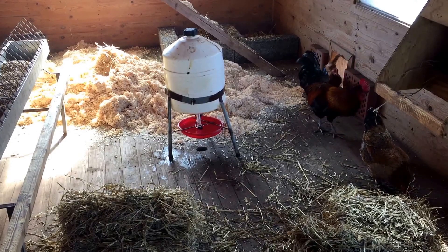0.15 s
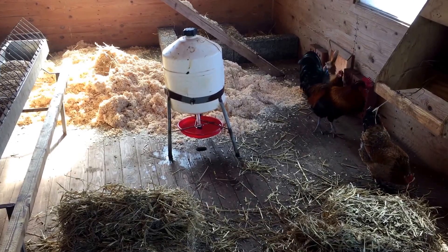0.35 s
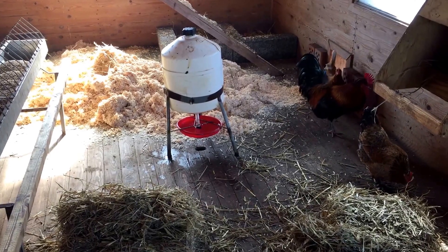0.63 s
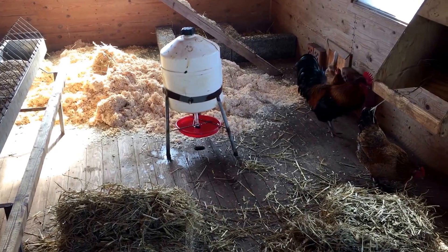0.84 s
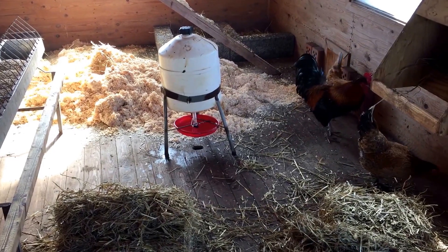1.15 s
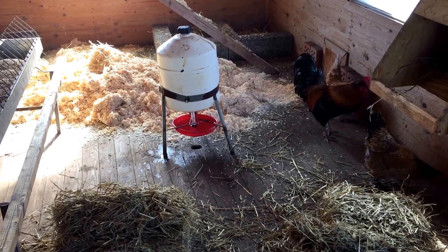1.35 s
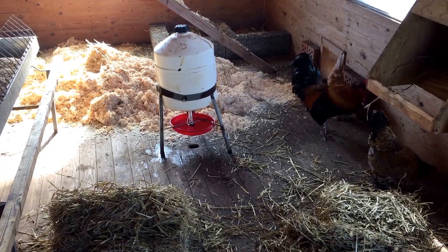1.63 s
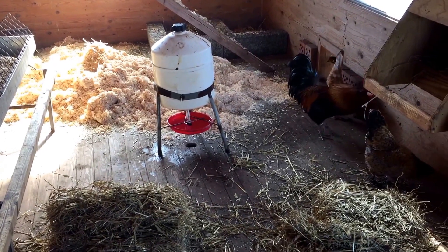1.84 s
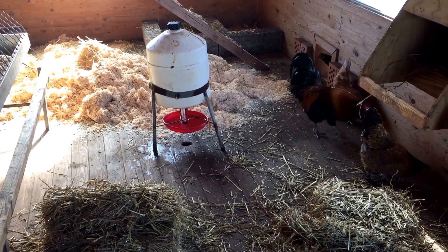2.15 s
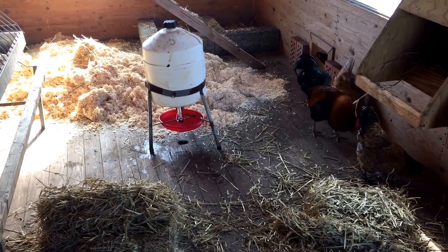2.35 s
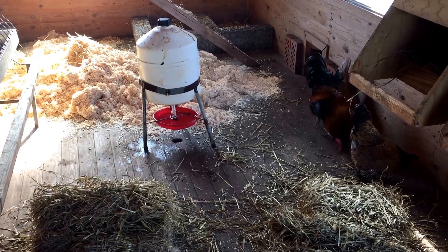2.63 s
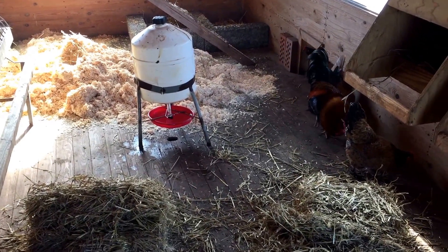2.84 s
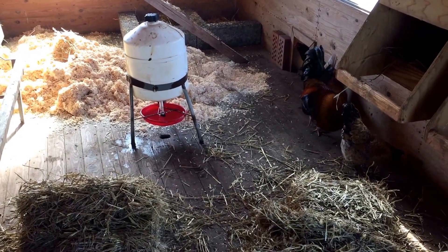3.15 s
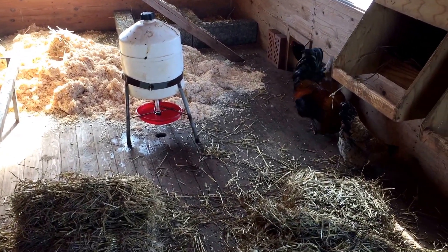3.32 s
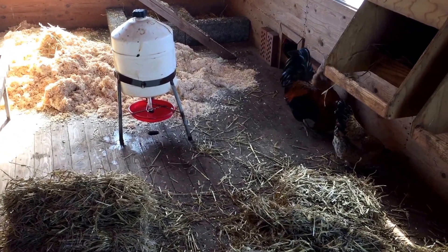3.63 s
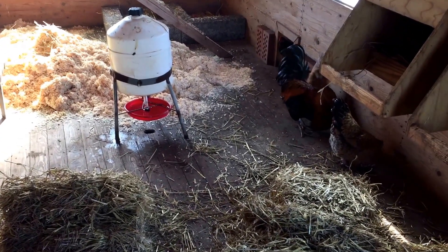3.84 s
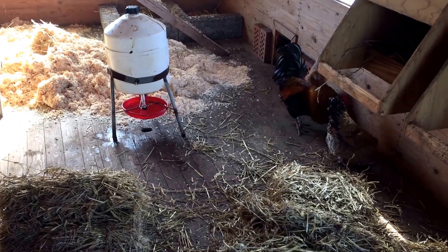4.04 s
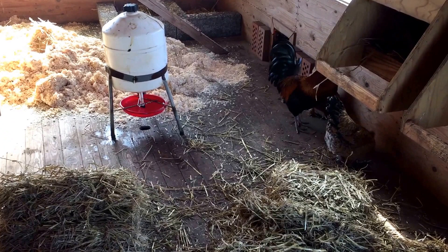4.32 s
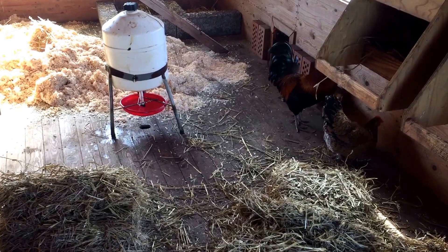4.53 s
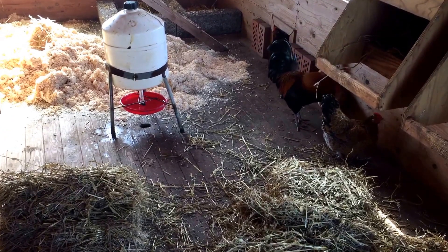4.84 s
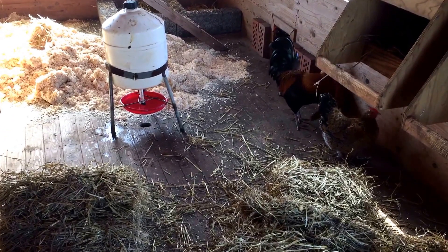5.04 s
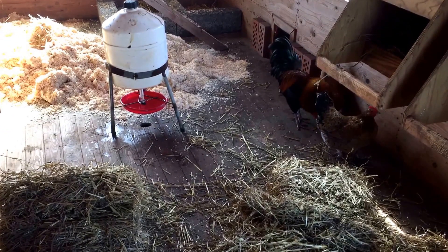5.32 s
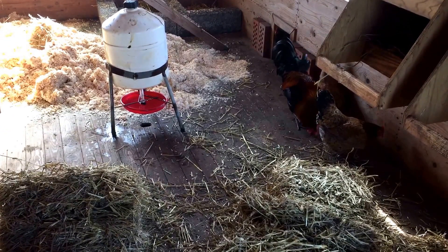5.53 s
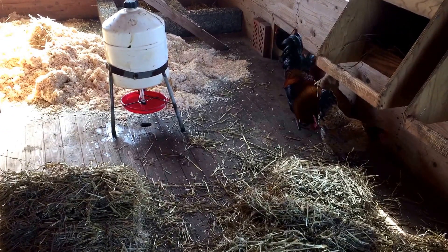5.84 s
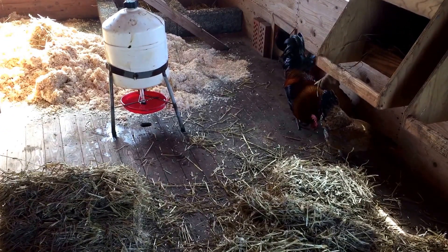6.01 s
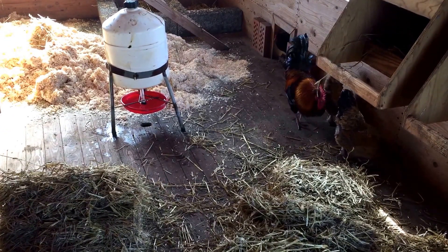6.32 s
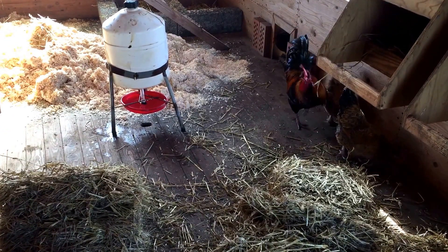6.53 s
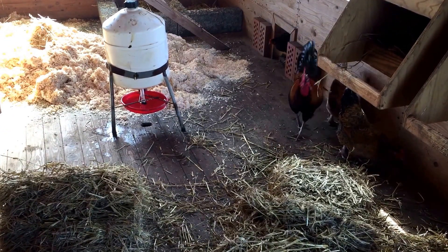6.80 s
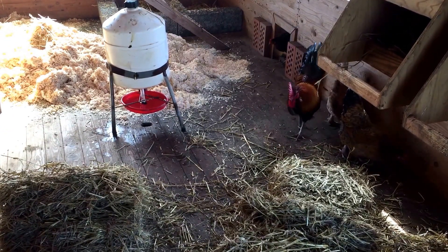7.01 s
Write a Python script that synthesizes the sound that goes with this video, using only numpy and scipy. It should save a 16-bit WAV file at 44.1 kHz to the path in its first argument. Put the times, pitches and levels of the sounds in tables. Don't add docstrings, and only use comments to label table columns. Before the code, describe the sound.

Hens cluck loudly in a bare plank coop, then calls thin out, leaving foot thuds, beak ticks and light straw crackle over soft hiss.

```python
import sys
import numpy as np
from scipy import signal
from scipy.fft import rfft, irfft
from scipy.io import wavfile
from scipy.ndimage import uniform_filter1d

SR = 44100
rng = np.random.default_rng(int(sys.argv[2]) if len(sys.argv) > 2 else 0)


def volts_from_db(level):
    exponent = np.asarray(level, float) / 20
    return 10 ** exponent


def wav_record(signal):
    frames = np.transpose(np.atleast_2d(signal))
    bounded = np.clip(frames, -1, 1)
    quanta = np.round(bounded * 32767).astype(np.int16)
    wavfile.write(sys.argv[1], SR, quanta)


N = 316094
CLEAR_BREATH, ROUGH_BREATH = 0.55, 0.9


def band(x, hz, width_hz):
    return signal.lfilter(*signal.iirpeak(hz, hz / width_hz, fs=SR), x)


def low(x, hz):
    return signal.sosfilt(signal.butter(4, min(hz, 0.45 * SR), fs=SR, output="sos"), x)


def unit(x):
    return x / np.max(np.abs(x))


def decay(t, t60_s):
    return np.exp(-np.log(1000) * t / t60_s)


def colour(x, table):
    hz, db = np.transpose(table)
    f = np.maximum(np.arange(len(x) // 2 + 1) * SR / len(x), 1)
    y = irfft(rfft(x) * volts_from_db(np.interp(np.log(f), np.log(hz), db)), len(x))
    return y / np.sqrt(np.mean(y ** 2))


def add(track, start_s, x):
    i = int(start_s * SR)
    track[i:i + len(x)] += x[:N - i]


def swells(table, rise_db_s, fall_db_s):
    t = np.arange(N) / SR
    gain = np.zeros(N)
    for s, db, hold_s in table:
        before_s = np.maximum(s - t, 0)
        after_s = np.maximum(t - s - hold_s, 0)
        gain += volts_from_db(db - rise_db_s * before_s - fall_db_s * after_s)
    return gain


def cluck(hz, throat_hz, swell_s, beak_db, beak, hold_s, jitter, breath, sag, wide, chest):
    t = np.arange(int(0.15 * SR)) / SR
    wobble, air_noise = rng.standard_normal((2, len(t)))
    wobble = uniform_filter1d(wobble, size=128) * np.sqrt(128)
    swell_s = max(swell_s, 0.001)
    end_s = swell_s + hold_s
    phase = np.cumsum(hz * (1 + sag * (0.5 - t / end_s) + jitter * wobble)) / SR
    puff = np.exp(-(phase % 1) / 0.053)
    shape = np.clip(t / swell_s, 0, 1) ** 2 * np.clip((end_s - t) / (1.32 * hold_s), 0, 1)
    leak = 0.16
    source = (puff - 0.07 + breath * air_noise * (puff + leak)) * shape

    pipe = chest * band(source, throat_hz, 2.2 * throat_hz)
    pipe += 1.45 * band(source, throat_hz, wide * throat_hz)
    top_hz = 1.218 * throat_hz + 300
    pipe = low(low(band(pipe, throat_hz, 2 * throat_hz), top_hz), top_hz)

    treble = np.zeros(len(t))
    for f, width_hz, db in beak:
        ring = band(band(band(source, f, width_hz), f, 3 * width_hz), f, 3 * width_hz)
        treble += volts_from_db(db) * unit(ring)
    return unit(pipe) + volts_from_db(beak_db - 13) * treble


def hen(calls, beak, beak_db, opening_db, **voice):
    half_open_hz = 800
    out = np.zeros(N)
    for s, db, hz, throat_hz, swell_s in calls:
        treble_db = beak_db + opening_db * np.log2(throat_hz / half_open_hz)
        add(out, s, volts_from_db(db) * cluck(hz, throat_hz, swell_s, treble_db, beak, **voice))
    return out


def loud_hen():
    # start in seconds, peak in dB, pitch in Hz, throat in Hz, swell in seconds.
    clucks = [(0.001, -51.5, 300.2, 820, 0.00055), (0.292, -39.5, 312.3, 920, 0.0035),
              (0.325, -52, 305.3, 925, 0.014), (0.425, -50.5, 320, 1000, 0.0014),
              (0.471, -31.5, 306, 1054, 0.0014), (0.689, -40, 231, 1052, 0.00085),
              (0.70, -44, 306, 693, 0.0016), (0.81, -49.5, 239.2, 970, 0.0028),
              (0.895, -37, 259.7, 1047, 0.00073), (0.905, -50, 306, 675, 0.0021),
              (0.96, -63, 256, 1130, 0.0077), (1.04, -64.5, 250, 1220, 0.0031)]
    long_call = [
        (1.83, -37.5, 226, 853, 0.036),
    ]
    # centre in Hz, width in Hz, level in dB.
    beak = [(1830, 730, 13), (2620, 110, 1.5), (2820, 170, 5.5), (4000, 720, -2), (6660, 400, -2.5),
            (7670, 320, -6.5), (9400, 970, -10), (12100, 930, -12.5)]
    out = hen(clucks, beak, beak_db=-31.5, opening_db=40, hold_s=0.035, jitter=0.06,
              breath=ROUGH_BREATH, sag=0.033, wide=0.061, chest=0.53)
    out += hen(long_call, beak, beak_db=-18, opening_db=0, hold_s=0.015, jitter=0.097,
               breath=CLEAR_BREATH, sag=0.019, wide=0.74, chest=0.11)
    return out


def clear_hen():
    # start in seconds, peak in dB, pitch in Hz, throat in Hz, swell in seconds.
    clucks = [
        (2.40, -68.5, 288, 320, 0.005),
        (2.548, -36.5, 224, 584, 0.018),
        (2.74, -56, 354, 393, 0.0028),
        (2.781, -40, 286.3, 500, 0.0026),
    ]
    # centre in Hz, width in Hz, level in dB.
    beak = [(2100, 510, 8.8), (2750, 180, 4.2), (3920, 430, 10.6), (6760, 630, 8.8), (12000, 1100, 2.2)]
    return hen(clucks, beak, beak_db=-4, opening_db=42.5, hold_s=0.02, jitter=0.029,
               breath=CLEAR_BREATH, sag=0.095, wide=1.5, chest=0.8)


def small_hen():
    # start in seconds, peak in dB, pitch in Hz, throat in Hz, swell in seconds.
    clucks = [
        (3.018, -48.5, 331.4, 626, 0.012),
        (3.21, -68, 297, 710, 0.024),
        (3.258, -52, 242, 482, 0.0073),
        (3.272, -55.5, 264.3, 540, 0.023),
        (3.474, -49.5, 241, 586, 0.00092),
        (3.54, -65.5, 242, 1180, 0.011),
    ]
    # centre in Hz, width in Hz, level in dB.
    beak = [(1460, 170, 8.5), (1790, 540, 23), (2300, 82, 11.5), (2870, 310, 4), (5800, 390, -6)]
    return hen(clucks, beak, beak_db=-18, opening_db=8.5, hold_s=0.016, jitter=0.043,
               breath=1.0, sag=0.12, wide=0.55, chest=0.36)


def hoarse_hen():
    # start in seconds, peak in dB, pitch in Hz, throat in Hz, swell in seconds.
    clucks = [(0.083, -45.5, 326.6, 616, 0.012), (1.635, -58, 293.4, 700, 0.015),
              (1.68, -53, 306, 770, 0.0033), (2.29, -69, 285.5, 780, 0.0049),
              (3.838, -51.5, 247.4, 610, 0.0012), (3.96, -58.5, 289, 580, 0.0026),
              (4.002, -41.5, 345, 660, 0.0052), (4.37, -65, 333, 760, 0.013),
              (4.537, -47, 278.5, 700, 0.024), (4.775, -46.5, 319.2, 730, 0.023)]
    steady_call = [
        (2.018, -39.5, 308.6, 583, 0.046),
    ]
    # centre in Hz, width in Hz, level in dB.
    beak = [(1670, 780, 14.5), (2300, 200, -7), (3200, 380, -10), (4500, 560, 2), (7500, 1100, -8)]
    out = hen(clucks, beak, beak_db=-21, opening_db=7.5, hold_s=0.027, jitter=0.11,
              breath=1.64, sag=0.064, wide=3.5, chest=0.64)
    out += hen(steady_call, beak, beak_db=-17.5, opening_db=2, hold_s=0.031, jitter=0.038,
               breath=ROUGH_BREATH, sag=0.06, wide=3.5, chest=0.9)
    return out


def feet():
    # start in seconds, peak in dB, board in Hz.
    thuds = [(0.231, -35.5, 191.4), (1.455, -62, 370), (2.05, -49, 234), (2.314, -79, 80),
             (2.521, -44, 360), (2.799, -40.5, 130), (3.36, -55, 320), (3.476, -45, 329), (3.53, -52, 206),
             (3.668, -36, 347), (3.683, -32.5, 236), (3.729, -38, 208), (4.005, -42, 270),
             (4.204, -49.5, 127), (4.548, -45, 230), (4.785, -46.5, 242), (5.212, -39.5, 154),
             (5.231, -41.5, 118), (5.393, -58, 274), (5.719, -39, 404), (5.744, -29.5, 117.3),
             (5.853, -39, 369), (5.878, -38, 259), (6.194, -56, 132), (6.447, -46.5, 350),
             (6.489, -44.5, 345)]
    toes = [(.233, -39.5, 860), (3.02, -40, 439), (5.214, -51, 530), (5.722, -46.5, 600), (5.74, -45, 540),
            (6.448, -46.5, 615)]
    foot_push_s, toe_push_s, stiff_hz, stiffening = 0.0044, 0.0023, 250, 0.31
    out, t = np.zeros(N), np.arange(int(0.3 * SR)) / SR
    for steps, soft_s in (thuds, foot_push_s), (toes, toe_push_s):
        for s, db, hz in steps:
            contact_s = soft_s * (stiff_hz / hz) ** stiffening
            push = np.sin(np.pi * np.clip(t / contact_s, 0, 1)) ** 2
            boards = band(push, hz, 0.18 * hz)
            boards += 0.5 * band(push, 1.8 * hz, 0.64 * hz)
            boards += 0.2 * band(push, 2.26 * hz, 0.28 * hz)
            add(out, s, volts_from_db(db) * unit(boards))
    return out


def pecks():
    # start in seconds, peak in dB, wood in Hz, body in dB.
    hits = [(0.2964, -55.5, 1880, 13.5), (1.3807, -49, 2800, -30), (1.4636, -61.5, 1750, -11),
            (1.648, -65, 2750, 7), (2.5194, -42.5, 2090, -6), (2.7159, -51, 2180, -10),
            (3.3418, -50.5, 1610, -1.5), (3.4364, -67, 1750, -7), (3.6455, -35, 2750, -23),
            (3.6657, -42, 1900, -1), (3.7776, -50.5, 1500, -2), (3.7985, -48, 2000, -9),
            (4.185, -41, 2400, -6), (4.1947, -43, 2820, -11), (4.206, -31, 1760, -12),
            (4.7619, -41.5, 2600, -17), (5.215, -53, 1810, -7), (5.4054, -64, 2300, -10),
            (5.4986, -55.5, 2270, -18), (5.73, -47, 3180, 1), (5.7808, -41, 3000, -20),
            (5.8546, -39, 2010, -10), (6.1706, -37.5, 1930, -9.5), (6.462, -41, 2940, -16),
            (6.4744, -47.5, 1750, -4.5), (6.489, -36, 2420, -7.5), (6.8905, -47, 1880, -15.5)]
    tick_t60_s, plank_t60_s = 0.034, 0.032
    blow = 30
    width = 0.8
    ticks, planks, t = np.zeros(N), np.zeros(N), np.arange(int(0.1 * SR)) / SR
    for s, db, hz, body_db in hits:
        crack = rng.standard_normal(len(t)) * decay(t, tick_t60_s)
        scrape = rng.standard_normal(len(t)) * decay(t, plank_t60_s)
        crack[0] += blow
        tick = low(band(band(crack, hz, width * hz), hz, 2 * width * hz), 1.66 * hz)
        plank = low(band(band(scrape, 550, 920), 930, 840), 1880)
        add(ticks, s, volts_from_db(db) * unit(tick))
        add(planks, s, volts_from_db(db + body_db + 11.5) * unit(plank))
    return ticks, planks


def straw(grains_per_s, spread_db):
    # frequency in Hz, density in dB per Hz.
    straw_spectrum = [(300, 2), (1000, 4.5), (2500, 11), (5000, 0.5), (9000, -1.5), (15000, -3.5)]
    # start in seconds, level in dB, hold in seconds.
    rakes = [(.235, -66.5, .02), (.315, -64.5, 0.024), (1.15, -76, 0.0037), (1.382, -63.5, 0.011),
             (1.43, -76, .003), (1.472, -73.5, 0.013), (2.618, -69, .005), (2.714, -70, .005),
             (3.278, -71, 0.0052), (3.33, -82, .02), (3.43, -71.5, 0.028), (3.5, -68, 0.045),
             (5.166, -88, .005), (5.21, -69, .01), (5.70, -70, .17), (6.42, -73, 0.12), (6.662, -78, .004)]
    when, size, sign = rng.random(N), rng.exponential(1, N), rng.standard_normal(N)
    grains = (when < grains_per_s / SR) * volts_from_db(spread_db * size) * sign
    return colour(grains, straw_spectrum) * swells(rakes, rise_db_s=893, fall_db_s=453)


def coop(x, modes_db, diffuse_db, knee_s, fade_t60_s):
    # frequency in Hz, level in dB, t60 in seconds.
    plank_modes = [(118, -11, 0.053), (236, 4.5, 0.18), (306, 12.5, 0.21), (345, -8, 1), (401.4, 20.5, 0.2),
                   (550, 9, 0.25), (622, 4, 0.085), (700, 15.5, 0.12), (770, -17, 0.2), (841, 10.5, 0.32),
                   (925, 12, 0.27), (960, -11, 0.68), (1036, 9, 0.41), (1155, 4, 0.1)]
    # frequency in Hz, t60 in seconds, level in dB.
    walls = [(99, 0.16, 2), (256, 0.34, 7), (500, 0.53, 1.5), (1000, 0.33, 7), (2440, 0.25, 10),
             (5900, 0.22, 6.5), (14100, 0.14, 8.5)]
    t = np.arange(int(0.6 * SR)) / SR
    modes = np.zeros(len(t))
    for hz, db, t60_s in plank_modes:
        start_phase = rng.uniform(0, 2 * np.pi)
        modes += volts_from_db(db) * np.sin(2 * np.pi * hz * t + start_phase) * decay(t, t60_s)

    wall_hz, wall_t60_s, wall_db = np.transpose(walls)
    tail = np.zeros(len(t))
    for f in 70 * 2 ** np.arange(0, 8, 0.5):
        t60_s = np.interp(np.log(f), np.log(wall_hz), wall_t60_s)
        db = np.interp(np.log(f), np.log(wall_hz), wall_db)
        tail += volts_from_db(db) * band(rng.standard_normal(len(t)), f, 0.5 * f) * decay(t, t60_s)

    echo_s, scatter_db = 0.004, 2
    echoes = uniform_filter1d(rng.standard_normal(len(t)), size=int(echo_s * SR))
    echoes = volts_from_db(scatter_db * echoes / echoes.std())
    tail *= echoes / np.sqrt(np.mean(echoes ** 2))

    onset = np.clip(t / 0.0021, 0, 1)
    cut = decay(np.maximum(t - knee_s, 0), fade_t60_s)
    response = (volts_from_db(modes_db) * modes + volts_from_db(diffuse_db) * tail) * onset * cut
    return x + signal.fftconvolve(x, response)[:N]


def hiss():
    # frequency in Hz, density in dB per Hz.
    hiss_spectrum = [(26, -54), (45, 0.5), (200, 2.5), (507, -4.5), (950, -6.5), (1600, -7.5),
                     (3500, -10.5), (15600, -19.5)]
    # centre in Hz, width in Hz, share lost (0-1).
    port_dips = [(4800, 290, 0.48), (10450, 400, 0.71), (14900, 1100, 0.14)]
    noise = rng.standard_normal(N)
    for hz, width_hz, share in port_dips:
        noise = noise - share * band(noise, hz, width_hz)
    return volts_from_db(-70) * colour(noise, hiss_spectrum)


def rumble():
    # start in seconds, level in dB, hold in seconds.
    jolts = [(.34, -48, 0.017), (1.04, -56.5, .02), (1.71, -47.5, .01), (2.02, -52, .02),
             (2.18, -48, 0.0074), (2.31, -39.5, .005), (2.85, -38, .03), (3.33, -55, 0.035),
             (3.83, -42, .02), (4.01, -47.5, .02), (5.26, -62, .02), (5.75, -31, 0.0091), (5.89, -51, .03)]
    level_db, wander_db, wander_s = -60, 5, 0.24
    noise, drift = rng.standard_normal((2, N))
    drift = band(drift, 1 / wander_s, 2 / wander_s)
    shake = volts_from_db(level_db + wander_db * drift / drift.std())
    shake += swells(jolts, rise_db_s=295, fall_db_s=263)
    bass = colour(noise, [(15, -57), (35, -14.5), (60, 1.5), (90, -4), (150, -7.5), (400, -50)])
    return volts_from_db(-22.5) * bass * shake


def scene():
    voice_t60_s, knock_t60_s = 0.38, 0.2
    near = volts_from_db(10.5) * (loud_hen() + clear_hen())
    far = volts_from_db(13.5) * (small_hen() + hoarse_hen())
    voices = coop(near, modes_db=-65, diffuse_db=-33, knee_s=0.46, fade_t60_s=voice_t60_s)
    voices += coop(far, modes_db=-63.5, diffuse_db=-36.5, knee_s=0.17, fade_t60_s=voice_t60_s)
    boards = coop(volts_from_db(-1.5) * feet(), modes_db=-56, diffuse_db=-28, knee_s=0.12, fade_t60_s=knock_t60_s)
    ticks, planks = pecks()
    wood = coop(volts_from_db(1) * ticks, modes_db=-78, diffuse_db=-39, knee_s=0.086, fade_t60_s=knock_t60_s)
    wood += coop(volts_from_db(-6) * planks, modes_db=-66, diffuse_db=-32, knee_s=0.11, fade_t60_s=knock_t60_s)
    stalks = volts_from_db(-1.5) * straw(grains_per_s=850, spread_db=0.5)
    stalks = coop(stalks, modes_db=-55, diffuse_db=-39.5, knee_s=0.058, fade_t60_s=0.28)
    close = voices + boards + wood + stalks
    close = signal.sosfilt(signal.butter(2, 80, "high", fs=SR, output="sos"), close)
    return (close + hiss() + rumble())[None]


def roll_off(x):
    return signal.sosfilt(signal.butter(12, 15740, fs=SR, output="sos"), x)


def record(dry):
    keep = np.exp(-1 / (0.016 * SR))
    loudness = signal.lfilter([1 - keep], [1, -keep], np.abs(dry))
    gain = (1 + (loudness / volts_from_db(-39)) ** 2) ** -0.15
    top = signal.ellip(8, 0.2, 60, 15700, fs=SR, output="sos")
    mix = signal.sosfilt(top, dry * gain)
    return roll_off(mix)


dry = scene()
out = record(dry)
wav_record(out)
```